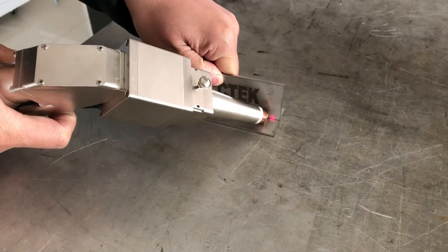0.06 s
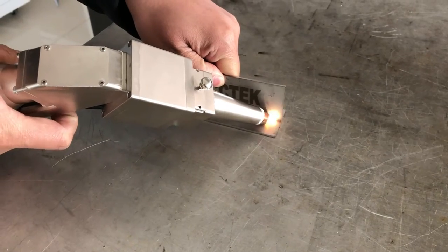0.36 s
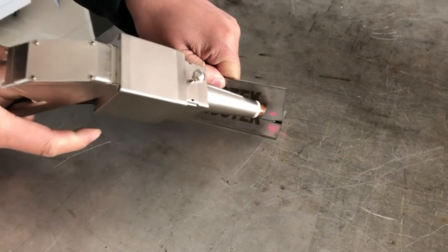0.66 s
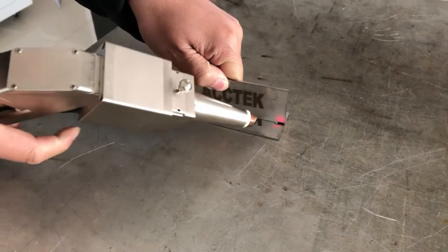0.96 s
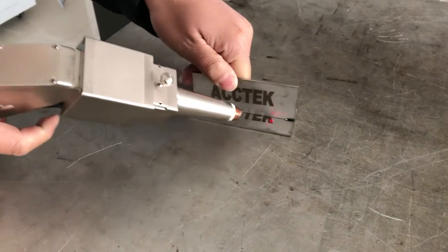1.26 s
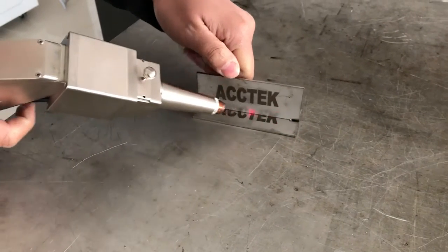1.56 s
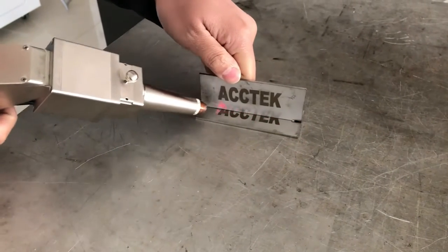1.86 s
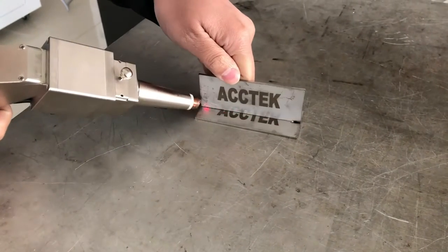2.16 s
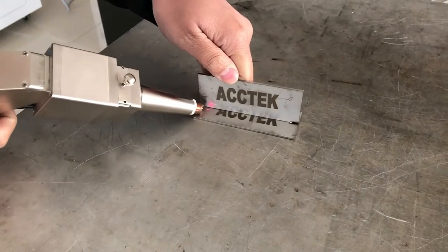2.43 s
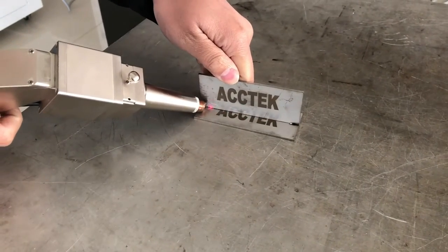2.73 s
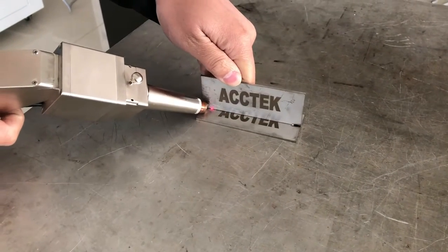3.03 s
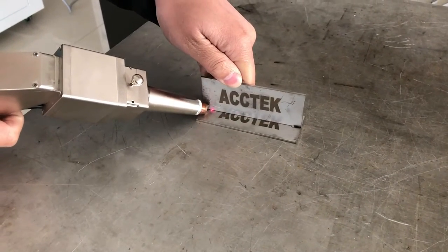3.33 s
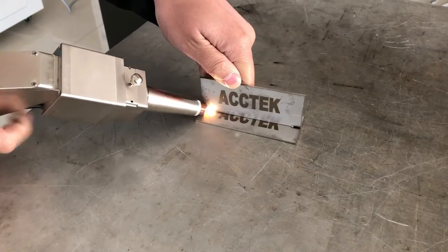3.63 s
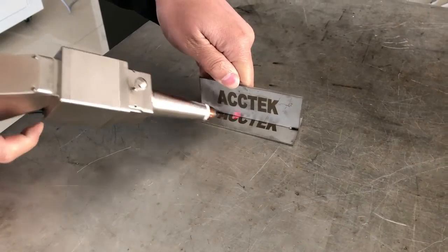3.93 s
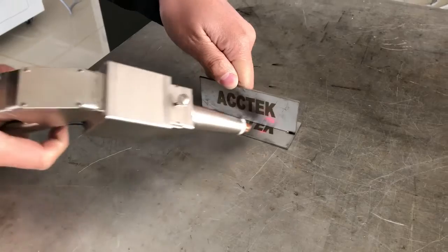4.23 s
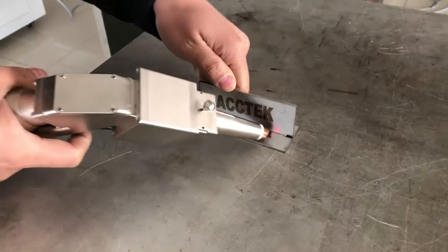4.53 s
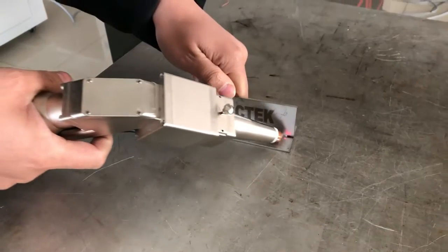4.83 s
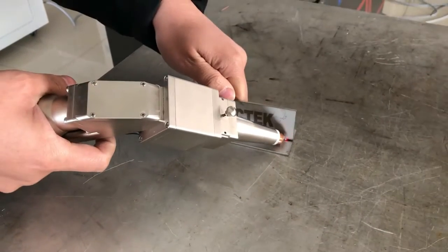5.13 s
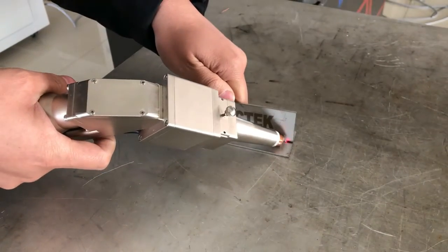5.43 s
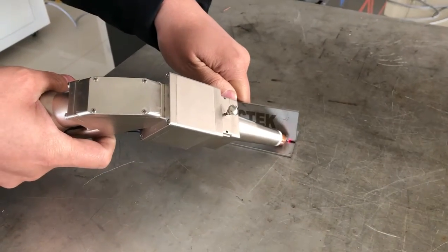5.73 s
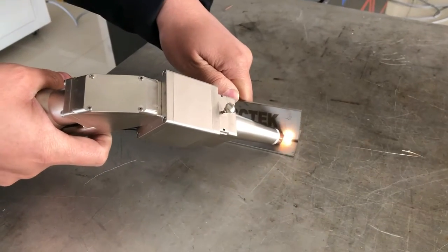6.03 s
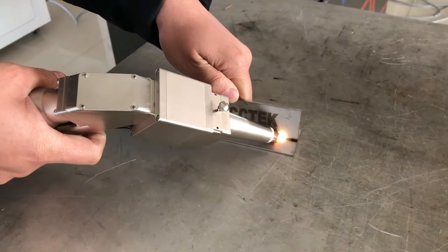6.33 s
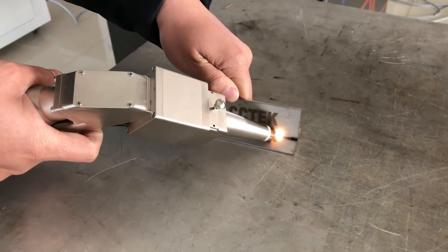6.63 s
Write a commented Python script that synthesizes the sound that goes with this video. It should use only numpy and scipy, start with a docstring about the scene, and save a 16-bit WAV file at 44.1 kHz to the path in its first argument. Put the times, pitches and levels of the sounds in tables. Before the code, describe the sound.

A handheld laser welder gives three close bursts of bright gas hiss, each starting with a pop, with light metal taps between them.

```python
"""A pop, then a close, bright hiss: the gas valve of a handheld laser welder opens for three tack welds.
Shielding gas rushes through the nozzle tube, which rings like a short pipe, while the melt spits sparks.
After the first two welds the nozzle lifts, and the hiss turns hollow and dies as the hose empties.
In the pauses the nozzle taps and slides on the steel plate, over workshop air, mains hum,
faint whines and a distant motor. The scene is mono."""
import sys
import numpy as np
from scipy import signal
from scipy.fft import rfft, irfft, next_fast_len
from scipy.io import wavfile
from scipy.ndimage import uniform_filter1d

SR = 44100
rng = np.random.default_rng(int(sys.argv[2]) if len(sys.argv) > 2 else 0)


def dump(signal):
    """Clip the signal to [-1, 1] and save it as 16-bit WAV at the path in sys.argv[1]."""
    limited = np.clip(np.atleast_2d(signal).T, -1, 1)
    pcm = np.round(limited * 32767).astype(np.int16)
    wavfile.write(sys.argv[1], SR, pcm)


N = 295029
TIME = np.arange(N) / SR
FRAME, HOP, FIELD_FRAMES = 1024, 256, 400  # the hiss's spectral grid; its random fields outlast a burst
GAS_LAG_S, SEEP_S, SEEP_DB_PER_S = .0103, .4, 36  # gas trails the pop; the empty hose seeps a last trickle
CLICK_MODE_HZ, HIGH_CUT_HZ = 2770, 15950  # lowest ring of the struck tube; top of the mix

# Levels in the tables are relative: each layer adds its own trims and envelopes.
# room tone EQ: (frequency [Hz], level [dB])
AIR_EQ = [(15, -59), (30, -29), (60, -13), (120, -10.5), (195, -6), (320, -11), (620, -11), (1200, -17),
          (2000, -28.5), (3500, -36.5), (6000, -47), (9000, -48.5), (10000, -55.5), (16000, -60)]
# mains and machine hum: (frequency [Hz], level [dB], width [Hz])
HUM_PARTIALS = [(50, -59, .6), (101, -58, 1.5), (146.2, -56, 8), (188.7, -56.5, 10), (199.7, -53.5, 7.5),
                (390, -57.5, 3), (469, -62.5, 5), (557, -62, 4.5), (641, -59.5, 6)]
# faint high whines: (frequency [Hz], level [dB], width [Hz])
WHINE_BANDS = [(2647, -70.5, 78), (5383, -86, 60), (8120, -92.5, 160), (11450, -96, 400)]
# a machine sings up: (time [s], length [s], pitch [Hz], level [dB])
MACHINE_NOTES = [(2.82, .36, 2706, -66)]
# runs of the far motor: (time [s], length [s], starting pitch [Hz], bend at mid-run [Hz], level [dB])
MOTOR_RUNS = [(0.938, .76, 130.1, 28.5, -44.5), (2.258, .46, 148.6, -14, -48.5), (4.78, .42, 68, 1.5, -51)]
# nozzle taps the plate: (time [s], tick level [dB], bench thud level [dB])
NOZZLE_TAPS = [(2.331, -37, -54), (2.3415, -30, -38), (2.355, -37, -59), (2.5655, -43.5, -49),
               (2.711, -36.5, -53), (2.8635, -33.5, -56), (3.0228, -50, -64.5), (3.042, -46, -60.5),
               (4.765, -39, -55.5), (4.864, -32.5, -44), (5.0598, -28.5, -45.5), (5.1438, -45, -53)]
# nozzle slides into place: (time [s], length [s], level [dB])
NOZZLE_SLIDES = [(2.335, .03, -60), (2.45, .25, -69), (4.87, 0.25, -56.5), (5.62, 0.18, -58)]
# ring of the steel plate: (frequency [Hz], level [dB], t60 [s])
PLATE_MODES = [(1740, -16, 0.065), (2360, -0.5, .06), (2990, 0.5, 0.065), (3280, -5, 0.034),
               (3790, -14.5, 0.29), (4360, -11, 0.037), (5335, -20, 0.26), (6400, -14, .08),
               (7494, -17.5, 0.054)]
# ring of the bench under it: (frequency [Hz], level [dB], t60 [s])
BENCH_MODES = [(260, 8.5, 0.2), (436, -8, .3), (584, 2.5, 0.26), (787, 4, 0.19), (1125, 2, 0.059)]
# EQ of the nozzle rubbing on steel: (frequency [Hz], level [dB])
SCRAPE_EQ = [(300, -15), (1200, 7.5), (2200, -3), (3000, -3), (3900, -1.5), (5500, -17), (7000, -20),
             (9500, -27), (12000, -38), (16000, -55)]
# laser beam: (on [s], off [s])
BEAM_TIMES = [(.2, .45), (3.42, 4.5), (5.9, 8.4)]
# EQ of the rumble after the valve's pop: (frequency [Hz], level [dB])
RUMBLE_EQ = [(40, -28), (110, -10), (200, -2), (330, -9), (600, -5.5), (1300, -12.5), (3000, -39.5)]
# gas bursts: (valve opens [s], hose empty [s], fill time [s], fade stretch [x], click [dB], thump [dB],
# gas [dB], roar [dB], lowest tube resonance [Hz], its boost when seated [dB])
GAS_BURSTS = [(0.1076, 1.629, 0.053, 1.32, -7, -13.5, -0.45, 1.3, 2725, 8.5),
              (3.3236, 4.875, 0.042, 1.055, -6, -14, .2, -2.5, 2726, 13),
              (5.7986, 7.3, 0.094, 1, -5, -14, 0.47, 0.3, 2640, 11)]
# nozzle moves, per burst: (time [s], lift [0 seated, 1 free], first notch of the plate echo [Hz])
NOZZLE_POSES = [
    [(.78, 0.07, 14500), (.84, 0.2, 10450), (.92, 0.45, 6100), (1.03, 0.68, 7700), (1.24, 1, 7680),
     (1.38, 1, 4180), (1.46, 1, 4370), (1.58, 0.78, 5600)],
    [(3.96, 0.096, 14500), (4.06, 0.3, 8800), (4.2, 0.61, 6100), (4.32, 0.74, 5150), (4.42, .58, 6600),
     (4.5, 0.8, 9050), (4.62, 0.81, 11600), (4.78, 0.54, 12000), (4.92, .2, 13000)],
    [(5.8, .1, 14400)],
]
# gas EQ, nozzle seated on the plate: (frequency [Hz], level [dB])
SEATED_EQ = [(40, -44), (170, -27), (400, -24.5), (680, -15), (1000, -21), (1900, -9.5), (3700, -11),
             (5400, -8), (6300, 0), (7400, 2), (8700, -1.5), (10800, -6.5), (12300, -8), (13600, -14),
             (15000, -24)]
# gas EQ, nozzle free: (frequency [Hz], level [dB])
FREE_EQ = [(40, -36), (240, -12), (420, -12), (680, -6), (1000, -12.5), (2100, -9.5), (3700, -10.5),
           (6000, -6.5), (9000, -5.5), (12300, -14), (16000, -16)]
# upper tube resonances: (frequency [Hz], width [Hz], boost seated [dB], boost free [dB])
TUBE_MODES = [(4710, 173, 17, 18.5), (6530, 310, 5, 14), (8270, 360, 3, 12), (9940, 150, 5, 12),
              (11660, 280, 5.5, 13.5), (13100, 350, -2, 6)]
# echoes off the gun body, hand and bench: (base delay [s], level [dB])
NEAR_ECHOES = [(.0011, -35), (.0023, -27.5), (.0041, -21.5)]
# envelopes of four eddy bands, in the order tube tone, plate hiss, fizz, roar:
# (full flow [dB], onset offset [dB], lifted offset [dB], fade [s], fade curve [exponent], trickle [dB])
EDDY_BANDS = [(-18.5, -7.5, -7, 0.31, 1.67, -38.5), (-12.8, -7, -1, 0.21, 1.56, -39.5),
              (-22.5, -19.5, 0, 0.17, 2.8, -52.5), (-31.5, -9.5, 1, 0.4, 1.8, -32)]
# treble rides as the gun swings away, per burst: (time [s], plate hiss [dB], fizz [dB])
TREBLE_RIDES = [
    [(.7, 0.5, 2.5), (.77, -.5, -2), (.83, -4.5, -10), (.875, -11, 1), (.95, -9, -7), (1.066, -14, 2.5),
     (1.2, -13, 1), (1.28, -17.5, -9.5), (1.5, -17.5, -7)],
    [(3.92, 1.5, -.5), (4.014, -4.5, -14), (4.11, -22, -2), (4.24, -10.5, -9), (4.31, -7, -3),
     (4.43, -12.5, -5.5), (4.53, -11, -18), (4.6, -10, -21), (4.75, -13, -24)],
    [(5.8, -0.5, 3)],
]
# ringing pockets in the gap at the mouth: (peak time [s], half length [s], frequency [Hz], boost [dB])
GAP_POCKETS = [(.45, 0.66, 8400, 4), (1.54, 0.097, 8220, 12.5), (4.12, .09, 6730, 8),
               (4.32, 0.12, 7540, 4.5), (4.62, .15, 6700, 5), (6.65, 0.47, 1344, 10.5)]


def amp(db):
    """Decibels to gain."""
    return 10 ** (np.asarray(db) / 20)


def unit(x):
    """Scales to rms 1."""
    return x / np.sqrt(np.mean(x ** 2) + 1e-20)


def eq_gain(eq, hz):
    """Gain of an EQ curve, drawn on a log-frequency axis."""
    points_hz, db = np.transpose(eq)
    return amp(np.interp(np.log(hz + 1), np.log(points_hz), db))


def automation(rows, t):
    """Reads each lane of a breakpoint table at times t."""
    times, *lanes = np.transpose(rows)
    return [np.interp(t, times, lane) for lane in lanes]


def add(mix, start, sound):
    """Mixes a sound in at start seconds."""
    part = mix[max(round(start * SR), 0):][:len(sound)]
    part += sound[:len(part)]


def noise(count, eq):
    """Noise through an EQ curve, at rms 1."""
    size = next_fast_len(count)
    white = rfft(rng.standard_normal(count), size)
    return unit(irfft(white * eq_gain(eq, np.fft.rfftfreq(size, 1 / SR)), size)[:count])


def drift(rate):
    """Random modulator of rms 1 that turns rate times a second."""
    knots = rng.standard_normal(8192)
    return unit(np.interp(TIME * rate, np.arange(len(knots)), knots))


def blotches(shape, frames, bins):
    """Smooth random modulator over time and frequency."""
    field = rng.standard_normal((FIELD_FRAMES, shape[1]))
    for _ in range(2):
        field = uniform_filter1d(uniform_filter1d(field, frames, 0), bins, 1)
    return unit(field)[:shape[0]]


def swell(start, length, attack_s, release_s):
    """Envelope that rises until start, holds for length and dies away."""
    return np.exp(np.minimum(TIME - start, 0) / attack_s - np.maximum(TIME - start - length, 0) / release_s)


def ring(modes, t):
    """Dying sines of a struck object."""
    return sum(amp(db - 60 * t / t60) * np.sin(2 * np.pi * hz * t) * rng.choice([-1, 1])
               for hz, db, t60 in modes)


def peak(hz, centre, width, db):
    """Extra power of one resonance: a narrow core with wide skirts."""
    return (amp(db) ** 2 - 1) / (1 + ((hz - centre) / (width / 2)) ** 2)


def room_tone(air_db=-44.57):
    """The bed: workshop air and wavering machine hum."""
    out = amp(air_db) * noise(N, AIR_EQ)
    for hz, db, width in HUM_PARTIALS:
        level = amp(db) * np.sqrt(2) * (1 + .19 * drift(2 * width))
        out += level * np.sin(2 * np.pi * hz * TIME + 1.3 * drift(width))
    return out


def whines(swell_db=3):
    """Thin bands of noise, each swelling and fading by itself."""
    out = 0
    for hz, db, width in WHINE_BANDS:
        band = (drift(2 * width) + 1j * drift(2 * width)) * np.exp(2j * np.pi * hz * TIME)
        out += amp(db + swell_db * drift(2.5)) * band.real
    return out


def singing_machine(octave_db=-10):
    """A brief, thin, unsteady machine tone and its octave."""
    out = 0
    for start, length, hz, db in MACHINE_NOTES:
        phase = 2 * np.pi * hz * TIME + .7 * drift(40)
        level = amp(db) * swell(start, length, attack_s=.04, release_s=.08)
        out += level * (np.sin(phase) + amp(octave_db) * np.sin(2 * phase))
    return out


def far_motor(octave_db=-14, waver=.011, flutter_db=2.5, sag_db_per_s=2.5):
    """Each run of the motor bends away from its pitch and back while the level sags."""
    out = 0
    for start, length, hz, bend_hz, db in MOTOR_RUNS:
        age = np.clip(TIME - start, 0, length)
        pitch = (hz + bend_hz * np.sin(np.pi * age / length)) * (1 + waver * drift(30))
        phase = 2 * np.pi * np.cumsum(pitch) / SR
        level = swell(start, length, attack_s=.06, release_s=.08)
        level *= amp(db - sag_db_per_s * age + flutter_db * drift(16))
        out += np.sqrt(2) * level * (np.sin(phase) + amp(octave_db) * np.sin(2 * phase))
    return out


def nozzle_taps(ring_db=-15, crack_db=-4, crack_t60=.023, thud_db=-3, contact_s=.00024):
    """The nozzle ticks against the plate, ringing it and thudding the bench."""
    out, t = np.zeros(N), TIME[:SR // 3]
    attack = 1 - np.exp(-(t / contact_s) ** 2)  # soft copper needs a moment to bear on the steel
    for start, tick_db, bench_db in NOZZLE_TAPS:
        crack = noise(len(t), SCRAPE_EQ) * amp(crack_db - 60 * t / crack_t60)
        tick = amp(tick_db) * (crack + amp(ring_db) * ring(PLATE_MODES, t))
        thud = amp(bench_db + thud_db) * ring(BENCH_MODES, t)
        add(out, start, attack * (tick + thud))
    return out


def nozzle_slides(ring_db=-5, grain_db=.98):
    """The nozzle scrapes along, and the friction rings the plate."""
    strokes = sum(amp(db) * swell(start, length, attack_s=.07, release_s=.075)
                  for start, length, db in NOZZLE_SLIDES)
    friction = noise(N, SCRAPE_EQ)
    ringing = unit(signal.oaconvolve(friction, ring(PLATE_MODES, TIME[:SR // 100]))[:N])
    return (friction + amp(ring_db) * ringing) * strokes * amp(grain_db * drift(90))


def tube_click(t, ring_db=-29, t60=.02, rise_s=.00008, spike_hz=3000):
    """A sharp pressure transient, followed by the short ring of the tube."""
    spike = t / rise_s * np.exp(1 - t / rise_s) * np.cos(2 * np.pi * spike_hz * (t - rise_s))
    modes = TUBE_MODES + [(CLICK_MODE_HZ, 0, 11, 0)]
    ringing = sum(amp(db) * np.cos(2 * np.pi * hz * (t - rise_s)) for hz, _, db, _ in modes)
    return spike + amp(ring_db - 60 * t / t60) * ringing


def spatter(level_db=-27, sparks_per_s=70, spread_db=3):
    """The melt spits a crackle of small sparks while the beam is on."""
    beam = sum((TIME > on) & (TIME < off) for on, off in BEAM_TIMES)
    sizes = amp(level_db + spread_db * np.minimum(rng.exponential(1, N), 4))
    sparks = beam * sizes * (rng.random(N) < sparks_per_s / SR)
    return signal.oaconvolve(sparks, tube_click(TIME[:1024]))[:N]


def valve_pops(top_hz=1450, low_hz=300, glide_s=.0014, swell_s=.0019, boom_hz=210, boom_db=-14,
               boom_t60=.068, rumble_db=-21, rumble_t60=.87, puff_db=-22, puff_t60=.041):
    """The pressure front lands as a click, a falling chirp from the hose, a rumbling boom and a puff."""
    out, t = np.zeros(N), TIME[:SR // 4]
    pitch = low_hz + (top_hz - low_hz) * np.exp(-t / glide_s)
    chirp = np.sin(2 * np.pi * np.cumsum(pitch) / SR) * np.exp(-(t / swell_s - 1) ** 2)
    boom = np.sin(2 * np.pi * boom_hz * t) * amp(boom_db - 60 * t / boom_t60)
    for opens, _, _, _, click_db, thump_db, *_ in GAS_BURSTS:
        rumble = noise(len(t), RUMBLE_EQ) * amp(rumble_db - 60 * t / rumble_t60)
        puff = noise(len(t), SEATED_EQ) * amp(puff_db - 60 * t / puff_t60)
        add(out, opens, amp(click_db) * tube_click(t) + amp(thump_db) * (chirp + boom + rumble) + puff)
    return out


def tube_gain(hz, lift, low_hz, low_db, low_width_hz=165, low_free_db=19, wander=.007):
    """The tube's resonances wander with the jet and stand out once its mouth clears the plate."""
    hz = hz * (1 + wander * blotches(lift.shape, frames=8, bins=1))
    power = 1
    for centre, width, seated_db, free_db in [(low_hz, low_width_hz, low_db, low_free_db), *TUBE_MODES]:
        power += peak(hz, centre, width, seated_db + lift * (free_db - seated_db))
    return np.sqrt(abs(power))


def echo_gain(hz, lift, notch_hz, reflection=.67, stretch=2.7):
    """Echoes comb the hiss like a flanger: the longer their paths, the lower the notches."""
    plate_lag = .5 / notch_hz
    comb = 1 + reflection * lift * np.exp(2j * np.pi * hz * plate_lag)
    for delay, db in NEAR_ECHOES:
        comb += amp(db) * np.exp(2j * np.pi * hz * (delay + stretch * plate_lag))
    return abs(comb)


def pocket_gain(hz, t, q=9):
    """Each pocket's resonance swells and fades as the nozzle passes through its angle."""
    power = 1
    for when, half_length, centre, db in GAP_POCKETS:
        boost_db = db * np.exp(-((t - when) / half_length) ** 2)
        power += peak(hz, centre, 150 + centre / (2 * q), boost_db)
    return np.sqrt(abs(power))


def eddy_bands(hz):
    """Crossover for four sizes of eddy: tube tone (with the deepest rumble), plate hiss, fizz, roar."""
    above_rumble, above_roar, above_tone, above_hiss = (
        1 / (1 + (edge_hz / (hz + 1)) ** slope)
        for edge_hz, slope in [(1050, 10), (2300, 14), (5200, 55), (10800, 20)])
    tone = 1 - above_rumble + above_roar - above_tone
    return [tone, above_tone - above_hiss, above_hiss, above_rumble - above_roar]


def flow_gains(age, time_left, fill_s, fade_stretch, lift):
    """Envelope of each eddy band: the line fills, the flow holds, the hose drains to a trickle."""
    gains = []
    for full_db, onset_db, lifted_db, fade_s, curve, seep_db in EDDY_BANDS:
        flow = amp(full_db + onset_db * np.exp(-age / fill_s) + lifted_db * lift)
        drain = np.clip(time_left / (fade_s * fade_stretch), 1e-6, 1) ** curve
        seep = amp(seep_db + SEEP_DB_PER_S * np.minimum(time_left, 0))
        gains.append(flow * np.hypot(drain, seep))
    return gains


def gas_hiss(burst, pose, treble, flutter_db=.42, attack_s=.00095):
    """Turbulence rings the tube and splashes on the plate; returns the start time and the hiss."""
    opens, empty, fill_s, fade_stretch, _, _, gas_db, roar_db, low_hz, low_db = burst
    start = opens + GAS_LAG_S
    count = int((empty + SEEP_S - start) * SR)
    t = start + np.arange(count // HOP + 4)[:, None] * HOP / SR
    hz = np.fft.rfftfreq(FRAME, 1 / SR)
    lift, notch_hz = automation(pose, t)
    colour = eq_gain(SEATED_EQ, hz) ** (1 - lift) * eq_gain(FREE_EQ, hz) ** lift
    colour *= tube_gain(hz, lift, low_hz, low_db) * echo_gain(hz, lift, notch_hz)
    # the treble shifts in patches while the gun is swung about
    patch_db = (.8 + 1.8 * lift) * np.minimum(hz / 6000, 1)
    colour *= amp(patch_db * blotches(colour.shape, frames=13, bins=6))
    envelopes = flow_gains(t - start, empty - t, fill_s, fade_stretch, lift)
    trims_db = [0, *automation(treble, t), roar_db]
    power = 0
    for band, envelope, trim_db in zip(eddy_bands(hz), envelopes, trims_db):
        band_power = abs(band) * colour ** 2
        power += (envelope * amp(trim_db)) ** 2 * band_power / band_power.sum(1, keepdims=True)
    real, imag = rng.standard_normal((2, FIELD_FRAMES, len(hz)))[:, :len(t)]
    spectra = (real + 1j * imag) * np.sqrt(power) * pocket_gain(hz, t)
    hiss = signal.istft(spectra.T, nperseg=FRAME, noverlap=FRAME - HOP)[1][:count] * np.sqrt(3 / 2)
    gate = np.minimum(TIME[:count] / attack_s, 1)
    return start, hiss * gate * amp(gas_db + flutter_db * drift(93)[:count])


def scene():
    """The welding gun up front, the workshop behind it, the same on both channels."""
    mix = valve_pops() + spatter() + nozzle_taps() + nozzle_slides()
    mix += room_tone() + far_motor() + whines() + singing_machine()
    for burst, pose, treble in zip(GAS_BURSTS, NOZZLE_POSES, TREBLE_RIDES):
        add(mix, *gas_hiss(burst, pose, treble))
    return np.array([mix, mix])


def record(dry):
    """Master chain: a hard clip just under full scale, then a steep high cut."""
    low_pass = signal.firwin(511, HIGH_CUT_HZ, window=("kaiser", 9), fs=SR)
    return signal.oaconvolve(np.clip(dry, -.95, .95), low_pass[None], "same")


dry = scene()
out = record(dry)
dump(out)
```